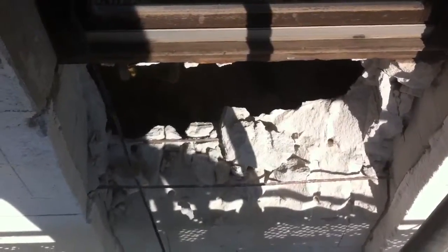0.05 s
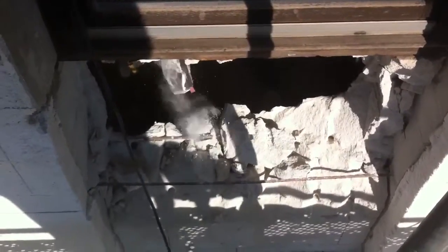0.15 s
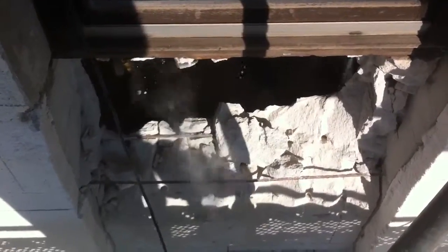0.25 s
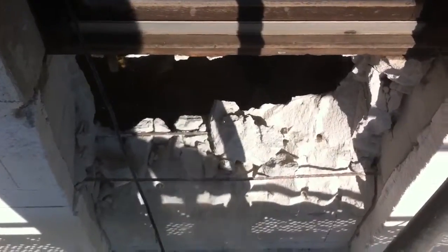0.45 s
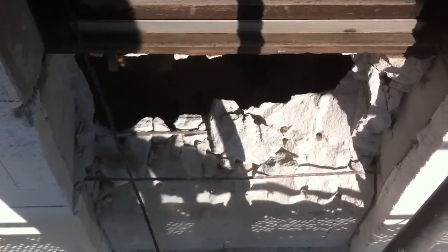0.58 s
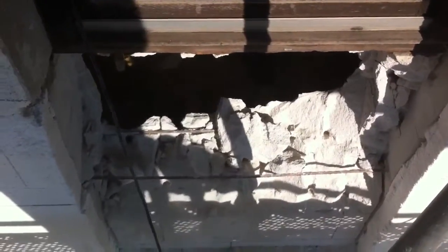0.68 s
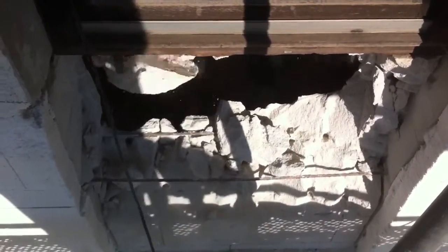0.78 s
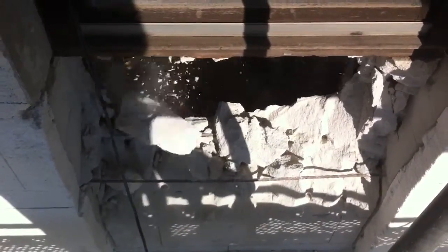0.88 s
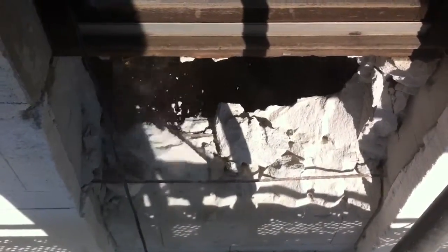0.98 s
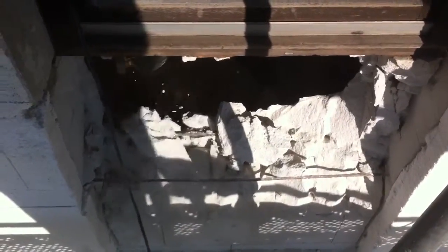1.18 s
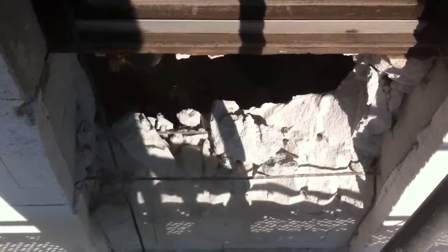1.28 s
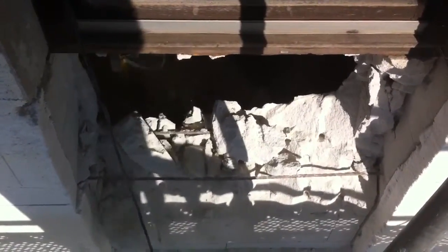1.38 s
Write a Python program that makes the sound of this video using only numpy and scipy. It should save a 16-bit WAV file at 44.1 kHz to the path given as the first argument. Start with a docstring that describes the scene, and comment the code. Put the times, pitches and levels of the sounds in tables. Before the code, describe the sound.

Two heavy hammer blows break a masonry wall, with debris falling after each.

```python
"""Outdoors, at a masonry wall under a window frame: two heavy hammer blows break the wall.
Each blow cracks, thumps, sets the wall ringing and booms in the space behind it.
Lumps thud down, stone pieces clack, chips tick and sand trickles over a quiet bed of open air.
A mid-band rasp plays background hiss, the hammer's swish before the first blow, then scraping debris.
A gain control ducks the loudest hits."""
import sys
import numpy as np
from scipy import signal
from scipy.fft import rfft, irfft
from scipy.io import wavfile
from scipy.ndimage import uniform_filter1d

SR = 44100
rng = np.random.default_rng(int(sys.argv[2]) if len(sys.argv) > 2 else 0)


def store_wav(level_fs):
    """Save 16-bit WAV to argv[1]."""
    pcm = np.round(np.clip(np.atleast_2d(level_fs), -1, 1) * 32767)
    wavfile.write(sys.argv[1], SR, pcm.T.astype(np.int16))


N = 63945
T = np.arange(int(.8 * SR)) / SR  # seconds within one hit and its tail

# Tone of the outdoor bed. Each row: frequency in Hz, gain in dB.
AIR_COLOUR = [(25, -9), (80, -15), (150, 1.5), (270, 11.5), (450, 0), (700, -1), (1100, -0.5), (2000, -8),
              (3000, -31), (4500, -20), (8000, -33), (15500, -25)]
# Spills of sliding sand. Each row: time in seconds, level in dB.
SAND_LEVEL = [(0, -54), (0.05, -59.5), (0.143, -55.5), (0.188, -49.5), (0.26, -62), (0.32, -43.5),
              (0.41, -54.5), (0.48, -56.5), (0.515, -43), (0.60, -58), (0.68, -61.5), (0.79, -49.5),
              (0.86, -59), (0.995, -66), (1.009, -44.5), (1.04, -59.5), (1.08, -56), (1.11, -45.5),
              (1.17, -50), (1.22, -59.5), (1.375, -61), (1.396, -47), (1.414, -59), (1.434, -41.5),
              (1.45, -48)]
# Tone of the sand. Each row: frequency in Hz, gain in dB.
SAND_COLOUR = [(100, -16), (600, -19), (2000, 5), (2900, -4.5), (4300, 3), (7500, 0), (11500, 0.5),
               (13000, -2), (15500, -5.5)]
# Mid-band rasp: background hiss, the hammer's swish before the first blow, then scraping debris.
# Each row: time in seconds, level in dB.
MID_RASP_LEVEL = [(0, -58.5), (0.06, -57.5), (0.135, -56.5), (0.188, -46.5), (0.25, -72), (0.45, -59),
                  (0.531, -54.5), (0.60, -67), (0.675, -52.5), (0.72, -59), (0.79, -53), (0.87, -61),
                  (1.015, -63), (1.06, -59), (1.22, -75), (1.36, -82), (1.45, -55)]
# Tone of the rasp. Each row: frequency in Hz, gain in dB.
MID_RASP_COLOUR = [(100, -16), (400, -7), (1000, 0.5), (1900, 4), (3000, 3), (4700, -2), (7000, -12.5),
                   (15000, -7.5)]
# Chips ticking. Each row: start in seconds, level in dB, pitch in Hz.
CHIP_HITS = [(0.0267, -41.5, 4930), (0.2903, -24.5, 11200), (0.3073, -20, 4920), (0.306, -27.5, 11200),
             (0.3160, -28, 4480), (0.332, -37, 11000), (0.3914, -30, 5860), (0.4344, -33.5, 11330),
             (0.5147, -32.5, 9970), (0.6325, -38, 6840), (0.7442, -41, 4300), (0.8300, -20.5, 6200),
             (0.9356, -42, 4130), (1.0540, -36.5, 9650), (1.0965, -21, 4430), (1.1196, -31.5, 11260),
             (1.1517, -39.5, 7900), (1.18, -33, 5420), (1.3072, -43.5, 7400), (1.3398, -43.5, 7910),
             (1.4278, -29.5, 11900), (1.437, -47, 7400)]
# Tone of a chip's tick. Each row: frequency in Hz, gain in dB.
TICK_COLOUR = [(300, -42), (2800, -2.5), (4500, -0.5), (11500, -1), (13000, -3), (15500, -4)]
# Ring of a chip. Each row: ratio to its pitch, t60 in seconds, level in dB.
CHIP_RING = [(1, 0.028, -11), (1.06, .014, -3)]
# Stone pieces knocking. Each row: start in seconds, level in dB, pitch in Hz, weight in dB, treble in dB.
STONE_HITS = [(0.059, -40, 1430, -4, -10), (0.5620, -39.5, 1880, 0, -9), (0.6967, -31.5, 1765, -39, -0.5),
              (0.7906, -37, 2040, -4.5, 1.5), (1.0847, -15, 2250, -3.5, -2), (1.0955, -20.5, 1640, 4, -3.5),
              (1.1098, -22.5, 1810, -6.5, -5), (1.2200, -42, 1590, 3.5, 1.5),
              (1.2593, -41.5, 2094, -13, 4.5), (1.3879, -32, 1770, -16, -4),
              (1.4020, -39.5, 1560, 4.5, -12), (1.4180, -26, 2074, -9, -12)]
# Noisy knock of a piece. Each row: frequency in Hz, gain in dB, t60 in seconds.
KNOCK_BANDS = [(99, 7, 0.022), (500, -0.5, 0.15), (1940, 9, 0.053), (3200, -16, 0.081), (4070, 3.5, 0.059),
               (7700, -0.5, 0.043), (15500, -6, 0.036)]
# Ring of a stone piece. Each row: ratio to its pitch, t60 in seconds, level in dB.
STONE_RING = [(1, 0.029, -1), (0.934, 0.016, -4), (1.6, 0.026, -14.5), (2.2, .03, -22)]
# Low body set off by a heavy piece. Each row: frequency in Hz, gain in dB, t60 in seconds.
WEIGHT_BANDS = [(40, -29, 0.25), (101, -3, 0.48), (227, 10, 0.41), (360, 8, 0.32), (750, 14, 0.072),
                (1200, -9, 0.28), (2800, -13.5, 0.24), (11900, -47, 0.1)]
# Lumps landing. Each row: start in seconds, level in dB.
LUMP_HITS = [(0.085, -46.5), (0.178, -48), (0.3340, -19.5), (0.3560, -29.5), (0.3800, -31), (0.4860, -24.5),
             (0.6200, -45.5)]
# Ring of what the lumps land on. Each row: frequency in Hz, t60 in seconds, level in dB.
GROUND_RING = [(339.7, 0.17, -4.5), (365.5, .14, 0), (421, 0.14, -6.5), (452, 0.083, -15.5),
               (533, 0.088, -8), (637, 0.044, -10), (762, 0.099, -18), (850, 0.09, -27)]
# Hammer blows. Each row: start in seconds, level in dB, decay stretch as a factor, boom and slap in dB,
# push in dB, push pitch in Hz, the crack's sub-bass in dB, its treble in dB.
HAMMER_HITS = [(0.2085, 2, 1.09, 0, -14, 480, -14, 0), (0.8267, 2, 0.83, -2.5, 1.5, 409, 3.5, 1)]
# Crack of the masonry. Each row: frequency in Hz, gain in dB, t60 in seconds before the stretch.
CRACK_BANDS = [(30, -21.5, .2), (81, -9, 0.42), (140, 6.5, 0.11), (372, 13, 0.17), (630, 5.5, 0.078),
               (885, 4.5, 0.064), (1580, 2.5, 0.083), (2130, -6.5, 0.089), (2920, -11.5, 0.057),
               (4280, -11, 0.075), (8600, -19, 0.044), (15400, -29, 0.042)]
# Ring of the wall. Each row: frequency in Hz, t60 in seconds, level in dB at the first blow's spot,
# level in dB at the second's.
WALL_RING = [(151.96, 0.43, -17.5, -35), (182.1, .36, -18, -22), (208.3, 0.43, -24, -31.5),
             (266, 0.45, -28, -29), (306.2, 0.33, -19.5, -22.5), (369.8, 0.21, -16.5, -17),
             (457, 0.12, -16.5, -22.5), (592, 0.13, -22.5, -19), (616.6, 0.12, -24, -18.5),
             (703, 0.25, -49, -31.5), (805, 0.13, -29, -26.5), (1020, 0.046, -34, -27),
             (1481, 0.089, -46, -20.5), (1590, .06, -23.5, -24), (1820, 0.045, -16.5, -26)]
# Boom of the space behind the wall. Each row: frequency in Hz, gain in dB, t60 in seconds.
BOOM_BANDS = [(30, -29, 0.26), (84.5, -17, 1), (146, 1.5, 0.63), (260, 1.5, 0.74), (530, -5.5, 0.49),
              (980, -18, 0.66), (2000, -23, 0.5), (3800, -37.5, 0.76), (15000, -46, 0.23)]


def amp(db):
    return 10 ** (np.asarray(db) / 20)


def unit_rms(x):
    return x / np.sqrt(np.mean(x ** 2) + 1e-20)


def add(mix, start, sound):
    part = mix[max(round(start * SR), 0):][:len(sound)]
    part += sound[:len(part)]


def fade(t60):
    """A tail that falls 60 dB in t60 seconds."""
    return np.exp(-np.log(1000) * T / t60)


def rise(seconds):
    """A softened attack with this time constant."""
    return 1 - np.exp(-T / seconds)


def colour(x, rows):
    """EQ along a curve of Hz and dB points."""
    hz, db = np.transpose(rows)[:2]
    freqs = np.fft.rfftfreq(len(x), 1 / SR)
    return irfft(rfft(x) * amp(np.interp(np.log(freqs + 1), np.log(hz), db)), len(x))


def burst(bands):
    """A hit of coloured noise in which each band dies at its own speed."""
    spectrum = rfft(colour(rng.standard_normal(len(T)), bands))
    freqs = np.fft.rfftfreq(len(T), 1 / SR)
    hz, _, t60s = np.transpose(bands)
    masks = [np.interp(np.log(freqs + 1), np.log(hz), band) for band in np.eye(len(hz))]
    return sum(irfft(spectrum * mask, len(T)) * fade(t60) for mask, t60 in zip(masks, t60s))


def ring(modes, scale=1):
    """Damped sines, their frequencies multiplied by scale."""
    return sum(amp(db) * np.sin(2 * np.pi * hz * scale * T) * fade(t60) for hz, t60, db in modes)


def shelved(bands, treble_db, sub_db=0, stretch=1):
    """Bands with treble and sub-bass shelves applied and their tails scaled."""
    return [(hz, db + treble_db * (hz > 2500) + sub_db * (hz < 110), t60 * stretch)
            for hz, db, t60 in bands]


def air(level_db=-44, drift_db=3.5):
    """A quiet bed of outdoor noise whose level wavers."""
    drift = uniform_filter1d(rng.standard_normal(N), size=1500)
    drift = unit_rms(uniform_filter1d(drift, size=1500))
    return colour(rng.standard_normal(N), AIR_COLOUR) * amp(level_db + drift_db * drift)


def grains(tone, per_second=7000, spread_db=3.5):
    """Dense clicks of uneven size."""
    clicks = (rng.random(N) < per_second / SR) * rng.choice([-1, 1], N)
    sizes = amp(spread_db * np.minimum(rng.exponential(1, N), 5))
    return unit_rms(colour(clicks * sizes, tone))


def grainy_hiss(tone, levels):
    """Spilling sand or the mid-band rasp: a stream of clicks that swells and ebbs."""
    level_db = np.interp(np.arange(N) / SR, *np.transpose(levels))
    return grains(tone) * amp(level_db)


def chips(focus_db=12.5, focus_octaves=.2):
    """Tiny fragments give a crisp tick that favours their pitch, a faint scatter and a brief ring."""
    out = np.zeros(N)
    freqs = np.fft.rfftfreq(len(T), 1 / SR) + 1
    envelope = fade(.0097) + amp(-13) * fade(.041)  # tick, then scatter
    for start, db, hz in CHIP_HITS:
        bell = np.exp(-(np.log2(freqs / hz) / focus_octaves) ** 2)
        noise = colour(rng.standard_normal(len(T)), TICK_COLOUR)
        tick = envelope * irfft(rfft(noise) * amp(focus_db * (bell - .5)), len(T))
        add(out, start, amp(db) * rise(.00059) * (tick + ring(CHIP_RING, scale=hz)))
    return out


def stones():
    """Hard pieces clack with a pitch of their own; heavy ones also shake the wall."""
    out = np.zeros(N)
    snap = 1 + amp(-9) * fade(.0052)  # extra bite on the attack
    for start, db, hz, weight_db, treble_db in STONE_HITS:
        knock = amp(-6.5) * snap * burst(shelved(KNOCK_BANDS, treble_db))
        note = amp(-4.5) * ring(STONE_RING, scale=hz)
        body = amp(weight_db - 1.5) * rise(.00069) * burst(WEIGHT_BANDS)
        add(out, start, amp(db) * (rise(.00015) * (knock + note) + body))
    return out


def lumps():
    """Lumps land with a dull thud: a short hollow note and a little grit."""
    out = np.zeros(N)
    for start, db in LUMP_HITS:
        grit = amp(-12.5) * burst(KNOCK_BANDS)
        add(out, start, amp(db) * rise(.0012) * (ring(GROUND_RING) + grit))
    return out


def thump(hz, decay_s):
    """A few heavy swings that die almost at once."""
    return rise(1 / (2 * np.pi * hz)) * np.sin(2 * np.pi * hz * T) * np.exp(-T / decay_s)


def hammer_blows(slap_delay_s=.01644):
    """Each blow shoves the wall, cracks mortar and sprays grit; the wall rings, the space behind booms."""
    out = np.zeros(N)
    for spot, (start, db, stretch, boom_db, push_db, push_hz, sub_db, treble_db) in enumerate(HAMMER_HITS):
        crack = amp(-3.5) * rise(.0015) * burst(shelved(CRACK_BANDS, treble_db, sub_db, stretch))
        wall = rise(.0041) * ring([(hz, t60, levels[spot]) for hz, t60, *levels in WALL_RING])
        boom = amp(boom_db - 7) * rise(.0062) * burst(BOOM_BANDS)
        spray = amp(-29) * rise(.006) * fade(.13 * stretch ** 2) * grains(SAND_COLOUR)[:len(T)]
        push = amp(push_db - 5.5) * thump(push_hz, decay_s=.0034)
        add(out, start, amp(db) * (crack + spray + wall + boom + push))
        slap = -amp(boom_db - 11) * thump(hz=293, decay_s=.012)  # dull slapback off the far side
        add(out, start + slap_delay_s, amp(db) * slap)
    return out


def scene():
    """The blows and their falling debris over the outdoor bed, in mono."""
    hits = hammer_blows() + lumps() + stones() + chips()
    sand = grainy_hiss(SAND_COLOUR, SAND_LEVEL)
    rasp = grainy_hiss(MID_RASP_COLOUR, MID_RASP_LEVEL)
    return (hits + sand + rasp + air())[None]


def record(dry):
    """The microphone cuts the lows, gain control ducks loud hits, peaks round off and the top is cut."""
    low_cut_hz, high_cut_hz, ceiling = 122, 15750, .85
    threshold_db, duck_share, recover_db_per_s = -8, .62, 35
    power_db = 10 * np.log10(abs(uniform_filter1d(dry[0] ** 2, size=300)) + 1e-12)
    recovery_db = np.arange(N) * recover_db_per_s / SR
    held_db = np.maximum.accumulate(power_db + recovery_db) - recovery_db  # grabs peaks, lets go slowly
    over_db = np.maximum(held_db - threshold_db, 0)
    duck_db = duck_share * uniform_filter1d(over_db, size=100)
    thinned = signal.lfilter(*signal.butter(1, low_cut_hz, "high", fs=SR), dry)
    rounded = ceiling * np.tanh(thinned / amp(duck_db) / ceiling)
    lowpass = signal.firwin(401, high_cut_hz, window=("kaiser", 8), fs=SR)
    return signal.oaconvolve(rounded, lowpass[None], "same")


dry = scene()
out = record(dry)
store_wav(out)
```